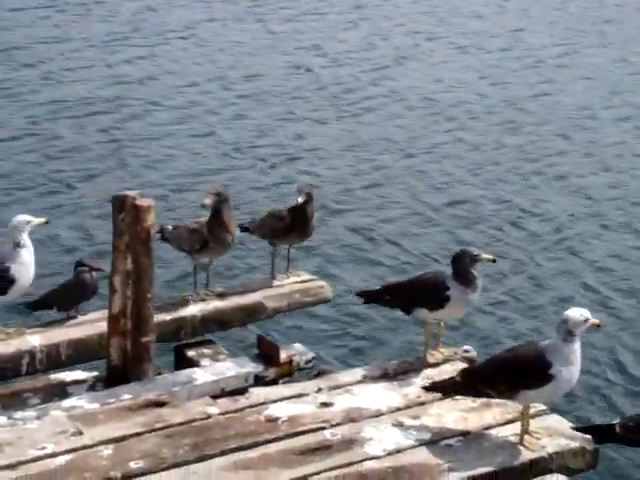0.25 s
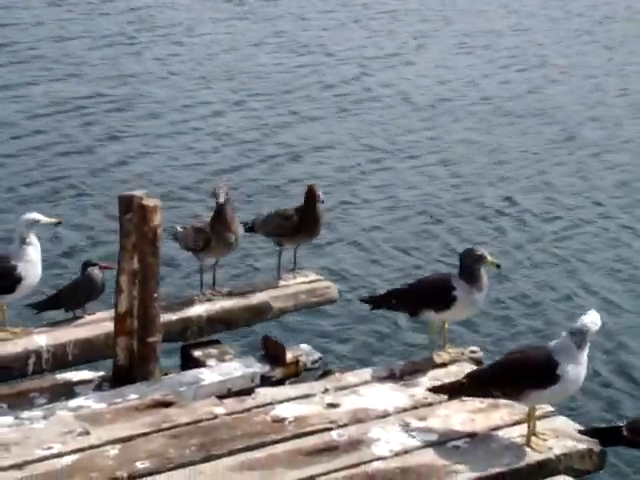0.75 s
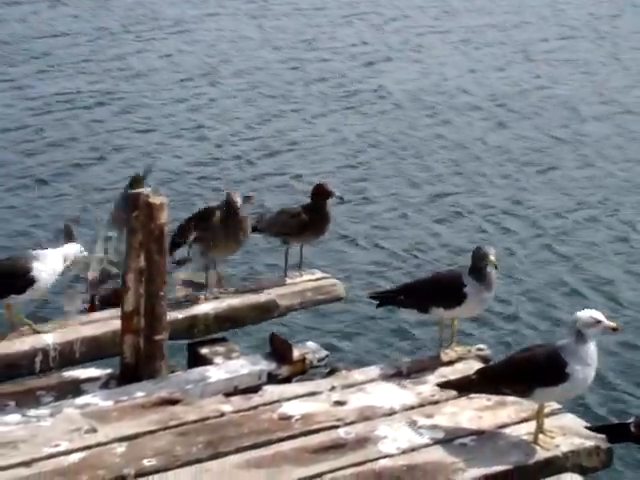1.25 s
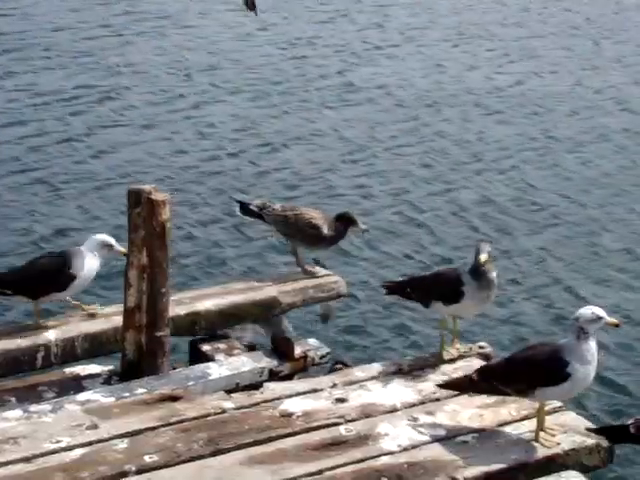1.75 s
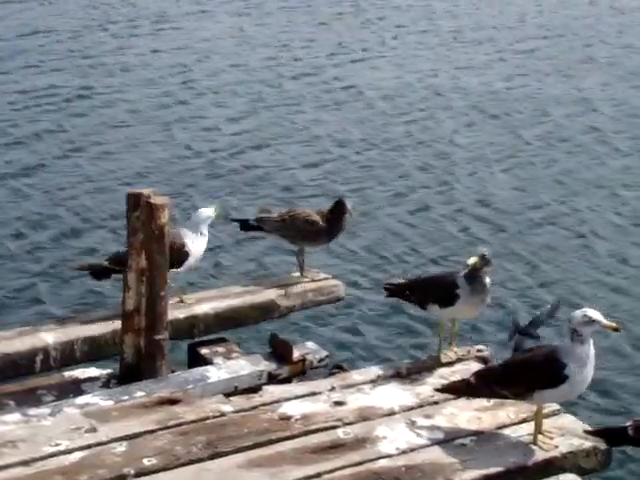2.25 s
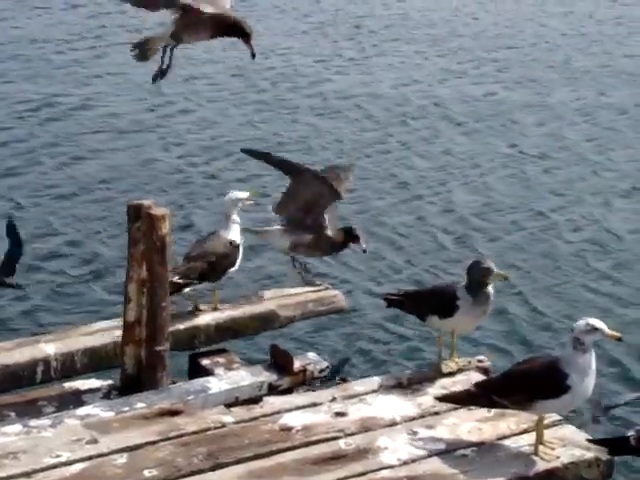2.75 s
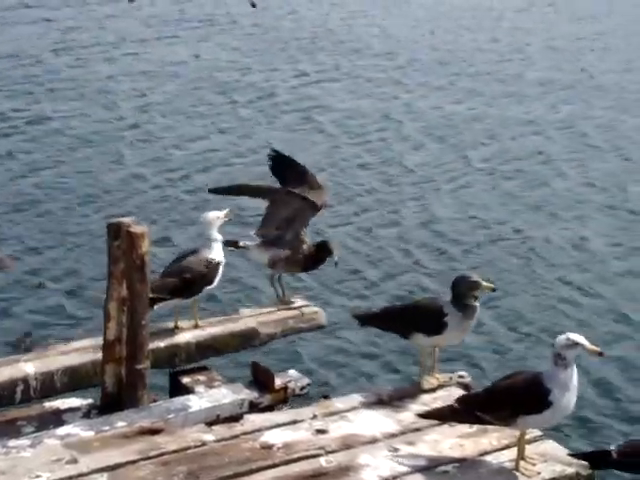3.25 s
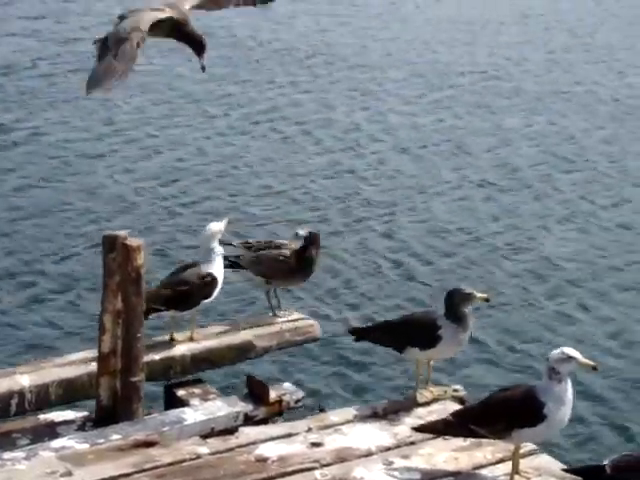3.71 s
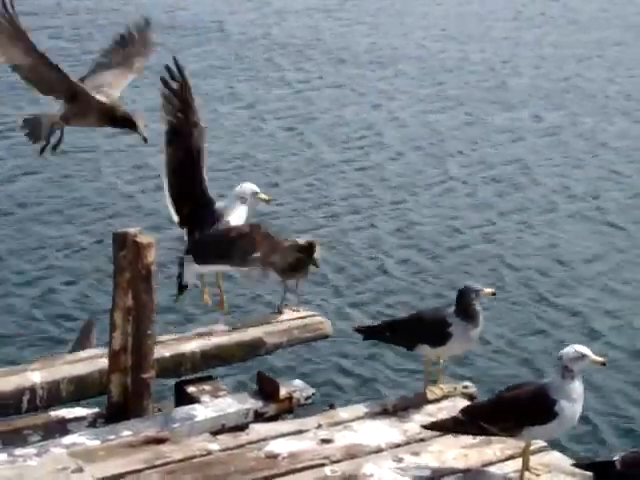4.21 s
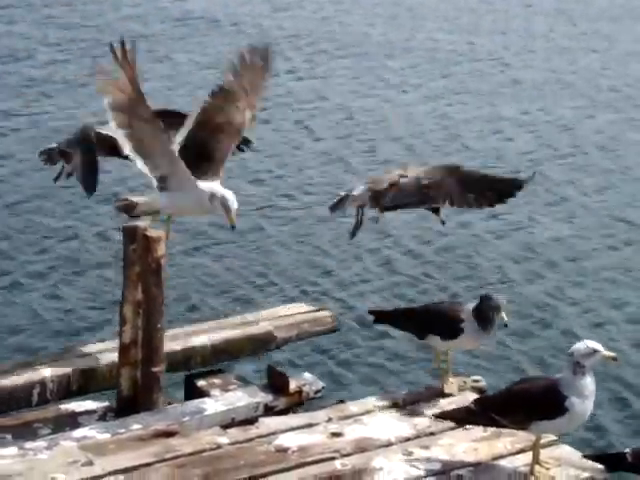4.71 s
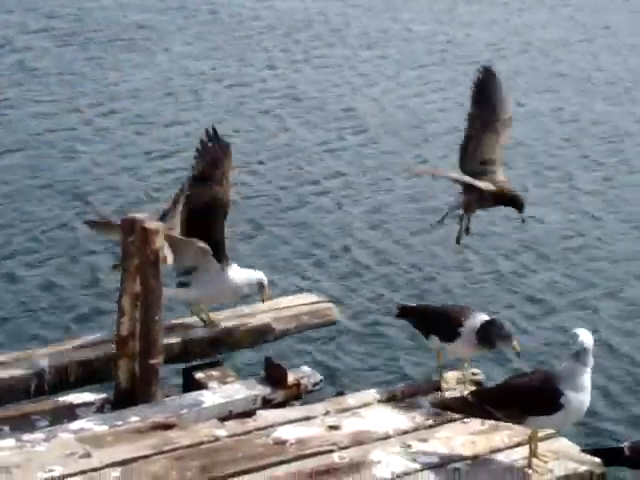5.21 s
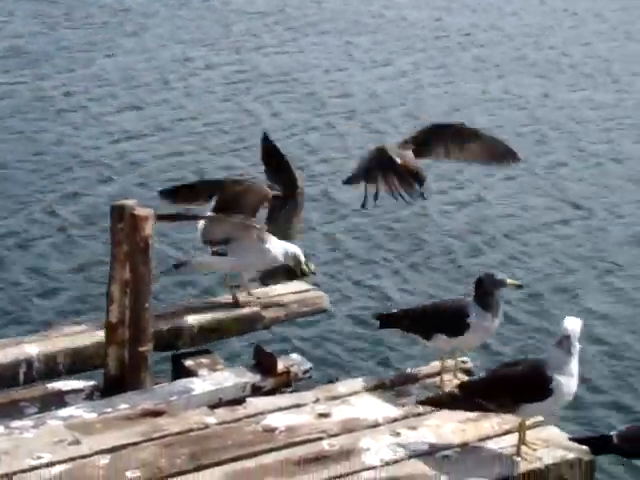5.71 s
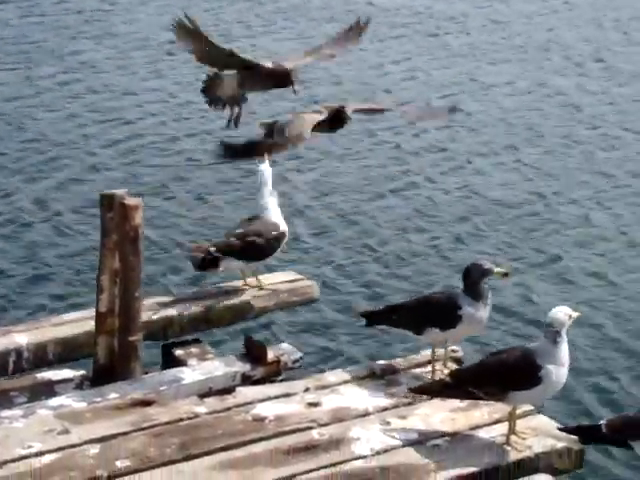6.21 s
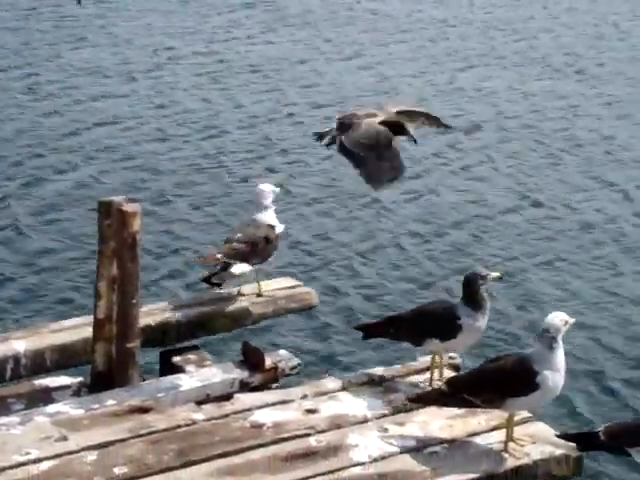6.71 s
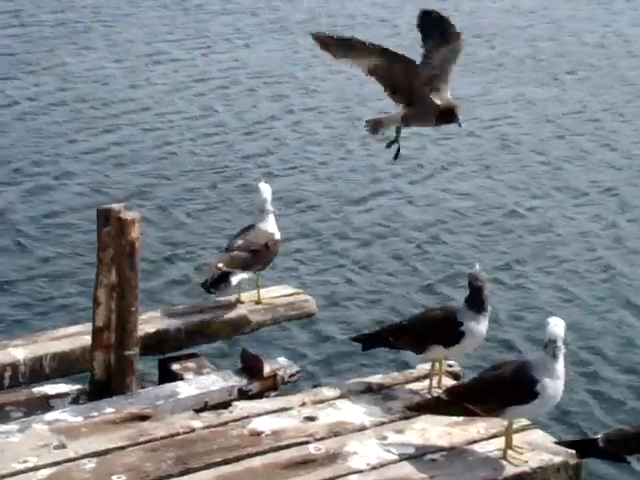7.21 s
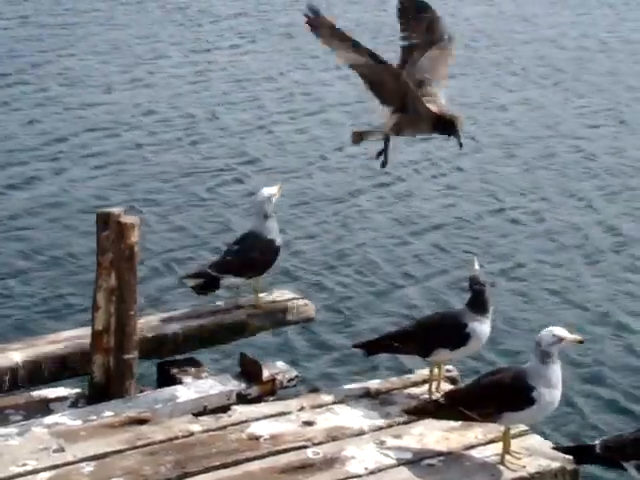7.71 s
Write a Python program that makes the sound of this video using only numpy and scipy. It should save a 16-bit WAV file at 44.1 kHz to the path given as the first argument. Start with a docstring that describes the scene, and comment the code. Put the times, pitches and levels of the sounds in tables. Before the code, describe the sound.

Close gulls rasp rapidly, give trembling nasal cries and sharp barks, with many seabirds chattering behind, water slopping and breeze bumping the microphone.

```python
"""Gulls cackle close to a small microphone on a wooden pier, in short rasps, then wail, yelp and bark.
Their voices are pulse trains and breath noise shaped by throat and beak; a young one gives two high whistles.
Behind them a whole seabird colony chatters: scores of overlapping calls and a wash of noise.
Filtered noise makes the water lapping below and the breeze rumbling on the microphone; short
decaying waves make the wind pops."""
import sys
import numpy as np
from scipy import signal
from scipy.fft import rfft, irfft, next_fast_len
from scipy.io import wavfile

SR = 44100
rng = np.random.default_rng(int(sys.argv[2]) if len(sys.argv) > 2 else 0)


def digitize_waveform(pressure):
    """Quantize a signal to 16-bit integers and store it at the path in sys.argv[1].

    Rows of a 2-D input are taken as channels; values are limited to [-1, 1].
    """
    field = np.atleast_2d(pressure).T
    bounded = np.clip(field, -1, 1)
    quanta = np.round(bounded * 32767).astype(np.int16)
    wavfile.write(sys.argv[1], SR, quanta)


N = 350595
T = np.arange(N) / SR
TOP_HZ = 10100  # upper limit of the recorder, and of the voices' harmonics


def undb(db):
    """Decibels to gain."""
    return 10 ** (np.asarray(db) / 20)


def unit(x):
    """Scale to rms 1."""
    return x / np.sqrt(np.mean(x ** 2) + 1e-18)


def curves(rows, t):
    """Each column of a table after the first, joined by straight lines over the times t."""
    s, *columns = np.transpose(rows)
    return [np.interp(t, s, c) for c in columns]


def span(start, end):
    """Sample times between two moments."""
    return T[max(int(start * SR), 0):int(end * SR)]


def add(out, t, x):
    """Mix x into out at the times t."""
    i = round(t[0] * SR)
    out[i:i + len(x)] += x


def colour(x, points, tilt_db=0):
    """Minimum-phase filter through (Hz, dB) points, tilted by dB per octave; rms 1."""
    n = 2 * next_fast_len(len(x) // 2 + 512)
    octave = np.log2(np.maximum(np.arange(n // 2 + 1) * SR / n, 1))
    hz, db = np.transpose(points)
    gain_db = np.interp(octave, np.log2(hz), db + tilt_db * np.log2(hz))
    # folding the cepstrum forward in time makes the filter causal
    cepstrum = irfft(np.log(undb(gain_db)))
    cepstrum[1:n // 2] *= 2
    cepstrum[n // 2 + 1:] = 0
    response = np.exp(rfft(cepstrum))
    return unit(irfft(rfft(x, n) * response)[:len(x)])


def walk(t, rate):
    """Random wander: straight lines through random values of spread 1, rate of them a second."""
    steps = rng.standard_normal(4096)
    return np.interp((t - t[0]) * rate, np.arange(len(steps)), steps, period=len(steps))


def turns_of(hz):
    """Phase in radians of a moving pitch."""
    return 2 * np.pi * np.cumsum(hz) / SR


def syrinx(t, hz, rough, split=0, jitter=0.0504, air=0.85):
    """Sharp pulses; roughness shakes their timing and adds a puff to each, split weakens every second one."""
    phase = turns_of(hz * (1 + jitter * rough * walk(t, 500)))
    count = int(TOP_HZ / np.mean(hz)) + 1
    pulses = unit(sum(np.cos(k * phase) for k in range(1, count + 1)))
    pulses = pulses * (1 + split * np.cos(phase / 2))
    breath = np.resize(rng.standard_normal(2 ** 15), len(t))
    puffs = unit(breath * (1 + np.cos(phase)) ** 2)
    return (pulses + air * rough * puffs) / np.sqrt(1 + (air * rough) ** 2)


def scatter(x, ring_s):
    """A few milliseconds of irregular ringing that changes shape as tongue and beak move."""
    age = span(0, .02)
    shapes = rng.standard_normal((4, len(age))) * np.exp(-age / ring_s)
    blend = np.array([walk(T[:len(x)], 70) for _ in shapes])
    rings = signal.fftconvolve(x[None], shapes, axes=1)[:, :len(x)]
    return unit(np.sum(rings * blend, axis=0) / np.linalg.norm(blend, axis=0))


def swell(t, centre, length, rise=2.5, fall=2.98):
    """A note's rounded rise and fall; higher powers give steeper edges."""
    power = np.where(t < centre, rise, fall)
    return np.exp(-np.abs(2 * (t - centre) / length) ** power)


def arch(t, centre, length):
    """Pitch factor of a note: highest at its centre, sagging at both ends."""
    return 1 - .21 * (1 - np.exp(-((t - centre) / (.66 * length)) ** 2))


def gate(t, attack_s, release_s):
    """Attack, hold and release over the times t."""
    return np.clip(np.minimum((t - t[0]) / attack_s, (t[-1] - t) / release_s), 0, 1)


# Spectral shape of the colony's mingled voices, behind the near birds.
# Each row: frequency in Hz, filter gain in dB.
COLONY_COLOUR = [(300, -29.5), (800, -13), (1400, -11.5), (2000, -0.5), (2600, -3.5), (3150, 3),
                 (3700, -5.5), (4600, -15.5), (6500, -19.5), (10000, -36)]
# The colony swells and ebbs. Each row: time in seconds, level in dB.
COLONY_SWELLS = [(0, -25), (1.3, -25.5), (1.9, -32.5), (2.6, -25), (3.2, -21.5), (3.9, -29), (4.3, -24),
                 (5.55, -33), (6.2, -27), (6.65, -28), (6.9, -33.5), (7.4, -23.5), (7.95, -24)]


def colony(count=170, blur_db=-3):
    """Scores of distant birds call over one another; the farthest merge into a wash of wavering noise."""
    calls = np.zeros(N)
    for k, (when, size, pitch, rough, loud) in enumerate(rng.random((count, 5))):
        centre, length = (k + when) / count * T[-1], .06 + .2 * size ** 2
        t = span(centre - length, centre + length)
        hz = (340 + 400 * pitch ** 2) * arch(t, centre, 1.5 * length) * (1 + .018 * walk(t, 70))
        voice = syrinx(t, hz, .25 + .5 * rough)
        add(calls, t, voice * swell(t, centre, length) * undb(7 * loud))
    wash = undb(blur_db + 2 * walk(T, 25)) * rng.standard_normal(N)
    return colour(unit(calls) + wash, COLONY_COLOUR) * undb(curves(COLONY_SWELLS, T)[0])


# Spectral shape of the water below. Each row: frequency in Hz, filter gain in dB.
WATER_COLOUR = [(25, -31), (70, -10.5), (160, -4.5), (300, -2.5), (600, -2.5), (1100, -4.5), (2000, -5),
                (8000, -23)]
# Lapping before its quick flutter, steady until its level dips for a while after the loud barks and recovers.
# Each row: time in seconds, level in dB.
LAPPING = [(.6, -31), (1.6, -33), (6.3, -32), (6.6, -39.5), (7.2, -42.5), (7.95, -34)]


def water(lap_db=3.5):
    """Small waves slop under the planks: coloured noise whose level wavers quickly."""
    level_db = curves(LAPPING, T)[0] + lap_db * walk(T, 16)
    return colour(rng.standard_normal(N), WATER_COLOUR) * undb(level_db)


# Gusts reaching the microphone. Each row: start in seconds, length in seconds, level in dB.
WIND_GUSTS = [(2.735, 0.4255, -28.5), (3.508, .13, -30), (3.797, 0.15, -31), (4.779, 0.3, -29),
              (5.48, .54, -33), (7.868, .04, -42)]
GUST_RISE_S, GUST_FALL_S = .08, .11
CALM_DB = -15  # light air against the water level


def breeze():
    """Strength of the wind: gusts rise quickly, hold and die away over the light air that stirs the water."""
    power = undb(curves(LAPPING, T)[0] + CALM_DB) ** 2
    for start, length, db in WIND_GUSTS:
        before = np.maximum(start - T, 0) / GUST_RISE_S
        after = np.maximum(T - start - length, 0) / GUST_FALL_S
        power = power + (undb(db) * np.exp(-before - after)) ** 2
    return np.sqrt(power)


EDDY_DB, EDDY_HZ = 10.5, 322  # pop level against its gust, middle pitch


def eddies(count=2):
    """A few pops at random moments in every gust, pitched within half an octave of the middle."""
    pops = []
    for start, length, db in WIND_GUSTS:
        for when, pitch in rng.random((count, 2)):
            moment = min(start + when * length, T[-1] - .02)
            pops.append((moment, db + EDDY_DB, EDDY_HZ * 2 ** (pitch - .5)))
    return pops


# Spectral shape of the wind rumble. Each row: frequency in Hz, filter gain in dB.
WIND_COLOUR = [(20, -19), (60, -5.5), (120, 0.5), (280, -1.5), (500, -6), (1000, -22), (3000, -30)]
# Strongest eddies popping on the microphone. Each row: start in seconds, level in dB, pitch in Hz.
STRONG_POPS = [(.073, -21.5, 605), (.788, -18.5, 413), (0.989, -8, 560), (3.071, -12, 252),
               (3.129, -13, 600), (3.14, -10.5, 842), (3.533, -16, 253), (3.56, -14.5, 332),
               (3.91, -15, 283), (5.143, -8, 304), (5.558, -15.5, 346), (5.964, -11, 570),
               (5.99, -14.5, 290), (6.345, -19, 700)]


def wind(gust_db=3, cycles=1.0, pop_db=0, wake=0.747, wake_s=0.009):
    """Gusty rumble; single eddies slap the microphone and leave a brief turbulent wake."""
    out = colour(rng.standard_normal(N), WIND_COLOUR) * breeze() * undb(gust_db * walk(T, 45))
    wake_colour = [(50, -16.0), (250, 2.5), (650, 2.5), (1100, -8.0), (2500, -25.0)]
    for start, db, hz in STRONG_POPS + eddies():
        t = span(start, start + 0.094)
        age = t - start
        turn = (age - .0035) * hz
        slap = np.sin(2 * np.pi * turn) * np.exp(-(turn / cycles) ** 2)
        eddy = np.resize(colour(rng.standard_normal(4096), wake_colour), len(t))
        add(out, t, undb(db + pop_db) * (slap + wake * eddy * np.exp(-age / wake_s)))
    return out


# Rasping notes close by. Each row: centre in seconds, length in seconds, level in dB,
# treble against that level in dB (before treble_db is added).
CACKLE_NOTES = [(.078, .13, -24.5, -15), (0.164, 0.076, -21, -17.5), (0.324, 0.062, -17.5, -15.5),
                (0.428, 0.0309, -22, -13), (0.506, .11, -16.5, -16), (0.668, 0.13, -18, -9.5),
                (0.799, 0.13, -18, -13.5), (0.972, 0.056, -16.5, -16), (1.082, 0.028, -19.5, -12),
                (1.145, .1, -18.5, -12), (1.289, 0.1216, -21.5, -13), (1.392, 0.0428, -15, -10.5),
                (1.47, 0.048, -17.5, -14.5), (1.505, 0.043, -14.5, -12), (1.607, .038, -12, -11),
                (1.705, 0.032, -14, -13), (1.75, 0.0237, -17, -12.5), (1.804, 0.038, -15, -18.5),
                (1.89, 0.036, -12, -14.5), (2.011, 0.055, -15.5, -15.5), (2.135, 0.0942, -18.5, -17.5),
                (2.235, 0.04, -19.5, -19.5), (2.275, 0.0435, -16, -20.5), (2.369, 0.045, -18.5, -17),
                (2.406, .022, -18.5, -13), (2.481, 0.0336, -17.5, -16), (2.555, 0.0239, -16, -19),
                (2.596, 0.046, -18, -18), (2.692, 0.0838, -18.5, -15.5), (2.799, 0.0302, -18, -11.5),
                (2.891, 0.0807, -19, -15.5), (3.02, .055, -18, -17), (3.148, 0.054, -21, -21.5),
                (6.971, 0.054, -22.5, -17.5), (7.094, 0.061, -25.5, -15.5), (7.204, 0.0682, -22.5, -15.5),
                (7.721, 0.082, -25, -17.5), (7.837, 0.1155, -27, -10.5)]
# Throat and open beak in a rasp. Each row: frequency in Hz, filter gain in dB.
RASP_BODY = [(400, -27.5), (1400, -15), (2000, -1.5), (2400, 0), (3000, 0), (3600, -3), (4400, -11.5),
             (5200, -13), (7000, -41.5)]
# Upper resonances of a rasp. Each row: frequency in Hz, filter gain in dB.
RASP_EDGE = [(3500, -34.5), (5000, -15.5), (6200, 2), (7100, 3.5), (8200, 0), (9400, -1.5), (10200, -22)]
# the beak resonance of notes up to SOFT_DB; it sinks as the bird calls harder
BEAK_HZ, SOFT_DB, BEAK_SAG_HZ_PER_DB = 2946, -20, 42
BEAK_SCATTER = .04  # share by which it varies from note to note


def cackles(flutter_db=1.5, body_db=0, treble_db=1, beak_gain=0.97, beak_width_hz=450):
    """Harsh notes: the membranes flap irregularly, the beak rings, and upper resonances add a treble edge."""
    out = np.zeros(N)
    for (centre, length, db, bright_db), chance in zip(CACKLE_NOTES, rng.standard_normal(len(CACKLE_NOTES))):
        beak_hz = BEAK_HZ - BEAK_SAG_HZ_PER_DB * max(db - SOFT_DB, 0)
        beak_hz *= 1 + BEAK_SCATTER * chance
        t = span(centre - length, centre + length)
        # at the top of the note the fifth harmonic sits on the beak resonance
        hz = beak_hz / 5 * arch(t, centre, 1.3 * length)
        voice = syrinx(t, hz, rough=.9, jitter=.08)
        flaps = scatter(voice, ring_s=.0012) * undb(flutter_db * walk(t, 260))
        beak = signal.lfilter(*signal.iirpeak(beak_hz, beak_hz / beak_width_hz, fs=SR), flaps)
        body = undb(body_db) * colour(flaps + beak_gain * beak, RASP_BODY)
        body = body * swell(t, centre, length, rise=3.6, fall=2.05)
        edge = undb(bright_db + treble_db) * colour(flaps, RASP_EDGE)
        edge = edge * swell(t, centre, length, rise=5, fall=3.5)
        add(out, t, (body + edge) * undb(db))
    return out


# Long nasal calls close by. Each row: start, top and end in seconds, top pitch in Hz, level at the
# top in dB, crescendo in dB per second, roughness at the top from 0 to 1, brightness in dB per octave.
WAIL_CALLS = [(3.07, 3.279, 3.58, 514, -21, 3.5, 0.26, 0), (4.049, 4.148, 4.3, 472, -24.5, -20, 0.36, -2.5),
              (4.32, 4.428, 4.65, 470, -21.5, -10, 0.71, -3), (4.966, 5.121, 5.48, 499, -24, 7, 0.11, -1),
              (6.109, 6.192, 6.3, 472, -24, -23, .12, 0), (7.248, 7.399, 7.7, 367, -25.5, -4, 0.01, -2.5)]
# Throat and open beak in a wail. Each row: frequency in Hz, filter gain in dB.
WAIL_COLOUR = [(400, -30.5), (1400, -27), (1900, -12), (2500, -7), (2950, -6), (3280, -0.5), (3650, -8.5),
               (4700, -17.5), (5500, -21), (7200, -18), (8400, -21), (10000, -25.5)]
# away from its top a wail sinks in pitch, and the slack voice turns hoarse
WAIL_SAG_PER_S, WAIL_TOP_S, HOARSE_PER_SAG, HOARSEST = .55, .12, 7.3, 0.76
WAIL_ATTACK_S, WAIL_RELEASE_S = 0.032, 0.11


def wails(tremor_db=2):
    """Long trembling calls, highest and clearest at the top of their arch and hoarser away from it."""
    out = np.zeros(N)
    for start, top, end, top_hz, top_db, crescendo_db, top_rough, tilt_db in WAIL_CALLS:
        t = span(start, end)
        sag = WAIL_SAG_PER_S * (np.hypot(t - top, WAIL_TOP_S) - WAIL_TOP_S)
        hz = top_hz * (1 - sag) * (1 + .006 * walk(t, 50))
        rough = np.minimum(top_rough + HOARSE_PER_SAG * sag, HOARSEST)
        voice = syrinx(t, hz, rough, jitter=.06, air=1.2)
        call = colour(voice + .5 * scatter(voice, ring_s=.002), WAIL_COLOUR, tilt_db)
        db = top_db + crescendo_db * (t - top) + tremor_db * walk(t, 88.6)
        add(out, t, call * undb(db) * gate(t, WAIL_ATTACK_S, WAIL_RELEASE_S))
    return out


# Arched yelps and barks close by. Each row: top in seconds, length in seconds, top pitch in Hz, level
# in dB, half-pitch share from 0 to 1, harshness from 0 to 1, brightness in dB per octave.
YELP_CALLS = [(3.694, .085, 729, -20, 0.2, 0.07, -2.5), (5.59, 0.046, 886, -12, 0, 0, -6),
              (5.863, 0.059, 915, -12, 0.03, 0.16, -2), (5.967, .055, 893, -13.5, 0.07, 0.22, -5),
              (6.068, 0.039, 790, -13.5, 0, 0, -5.5), (6.275, 0.026, 1026, -12.5, 0.17, 0.26, 2.5),
              (6.3, 0.042, 903, -15, .6, 0.78, 2.5), (6.339, 0.036, 984, -13, 0.28, 0.45, 2),
              (6.367, 0.049, 920, -16.5, 0.6, 0.37, 3), (6.453, 0.054, 853, -15.5, 0.7, 0.22, 2.5)]
# Throat and open beak in a yelp. Each row: frequency in Hz, filter gain in dB.
YELP_COLOUR = [(400, -43), (900, -24), (1300, -8.5), (1750, -13.5), (2100, -4), (2650, -3.5), (3100, -7.5),
               (3600, -3.5), (4600, -15.5), (6500, -17), (10000, -24)]


def yelps(skirt=0.18, snap=14):
    """Arched cries: harsh ones start abruptly, split ones slide down and sound half their pitch too."""
    out = np.zeros(N)
    for centre, length, hz, db, split, harsh, tilt_db in YELP_CALLS:
        t = span(centre - 1.9 * length, centre + 2 * length)
        late = np.maximum(t - centre, 0) / length
        slide = np.exp(-.1 * split * late)
        pitch = hz * arch(t, centre, length) * slide * (1 + .006 * walk(t, 200))
        voice = syrinx(t, pitch, harsh, split, jitter=.07, air=1.2)
        # a split voice rings unevenly in the throat
        cry = colour(voice + .75 * split * scatter(voice, ring_s=.001), YELP_COLOUR, tilt_db)
        # a weaker, later skirt trails the main swell
        effort = (1 - skirt) * swell(t, centre, length, rise=2 + snap * harsh)
        effort = effort + skirt * swell(t, centre + length / 2, 1.49 * length)
        add(out, t, cry * undb(db + 4 * harsh * walk(t, 300)) * effort)
    return out


# A young gull's two whistles, one list each. Each row: time in seconds, pitch in Hz, level in dB.
YOUNG_WHISTLES = [
    [(3.83, 4330, -52.5), (3.842, 4267, -28), (3.92, 4933, -31), (3.936, 5190, -17), (3.984, 5380, -17.5),
     (4.058, 5200, -15.5), (4.156, 4870, -25), (4.224, 4420, -30.5), (4.245, 4100, -37)],
    [(6.52, 3834, -28), (6.55, 4115, -18), (6.588, 4560, -21), (6.598, 5345, -17), (6.61, 5480, -18),
     (6.63, 5180, -17.5), (6.65, 5280, -18.5), (6.662, 4780, -10), (6.678, 4580, -23), (6.698, 4390, -18),
     (6.704, 3450, -11.5), (6.784, 3045, -24), (6.8, 2700, -26)],
]
# The voice cracks late in the second whistle. Each row: time in seconds, cracked share from 0 to 1.
VOICE_CRACK = [(6.715, 0), (6.74, .85)]
WHISTLE_EDGE_S = 0.0067


def whistles(second_db=-7.5, third_db=-13, cracked_db=-9.5):
    """A thin tone of three harmonics; at the end of the second cry it cracks into a low squawk."""
    out = np.zeros(N)
    for rows in YOUNG_WHISTLES:
        t = span(rows[0][0], rows[-1][0])
        hz, db = curves(rows, t)
        crack, = curves(VOICE_CRACK, t)
        # the tone shakes most at the top of each whistle's range
        strain = (hz / hz.max()) ** 6
        fast_shake = (.007 + .008 * strain + .012 * crack) * walk(t, 1100)
        slow_shake = .005 * strain * walk(t, 300)
        phase = turns_of(hz * (1 + fast_shake + slow_shake))
        tone = np.sin(phase) + undb(second_db) * np.sin(2 * phase) + undb(third_db) * np.sin(3 * phase)
        # the period triples, so partials stand at thirds of the pitch
        squawk = undb(cracked_db) * sum(np.cos(k * phase / 3) * np.sqrt(2 / k) for k in range(2, 10))
        cry = np.sqrt(2) * ((1 - crack) * tone + 2 * crack * squawk)
        add(out, t, cry * undb(db + 2 * walk(t, 149.3)) * gate(t, WHISTLE_EDGE_S, WHISTLE_EDGE_S))
    return out


def harbour(x, echo_db=-15, t60=0.091):
    """Faint scattered echoes from planks, water and quay: a decaying noise tail after a 4 ms gap."""
    t = span(0, .5)
    tail = rng.standard_normal(len(t)) * undb(-60 * t / t60) * (t > .004)
    tail = unit(tail) / np.sqrt(len(t))  # total energy 1
    return x + undb(echo_db) * signal.fftconvolve(x, tail)[:N]


def scene():
    """Near gulls with their echoes, over colony, water and wind."""
    gulls = cackles() + wails() + yelps() + whistles()
    return (harbour(gulls) + colony() + water() + wind())[None]


def record(dry):
    """The recorder rounds the highest peaks and cuts everything above TOP_HZ."""
    rounded = dry / (1 + (dry / .78) ** 6) ** (1 / 6)
    low_pass = signal.ellip(12, .2, 80, TOP_HZ, fs=SR, output="sos")
    return signal.sosfilt(low_pass, rounded)


dry = scene()
out = record(dry)
digitize_waveform(out)
```